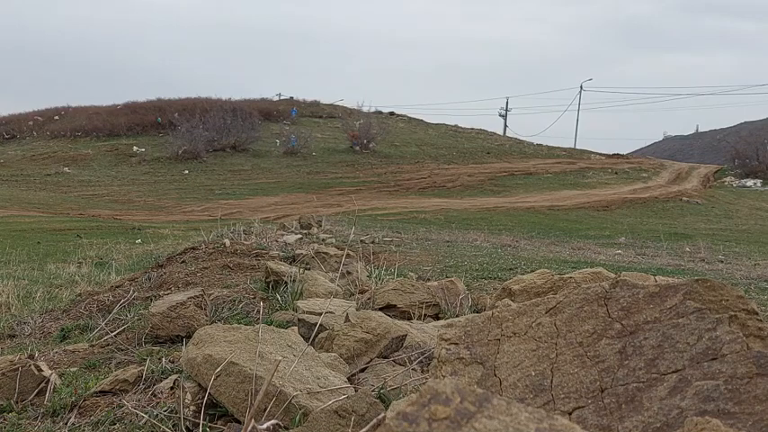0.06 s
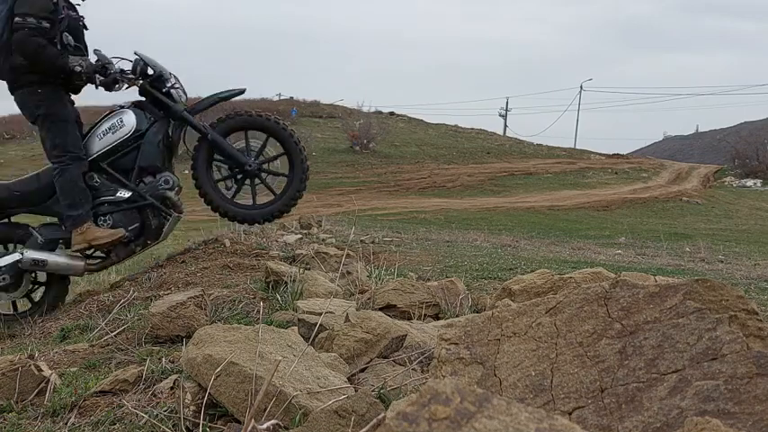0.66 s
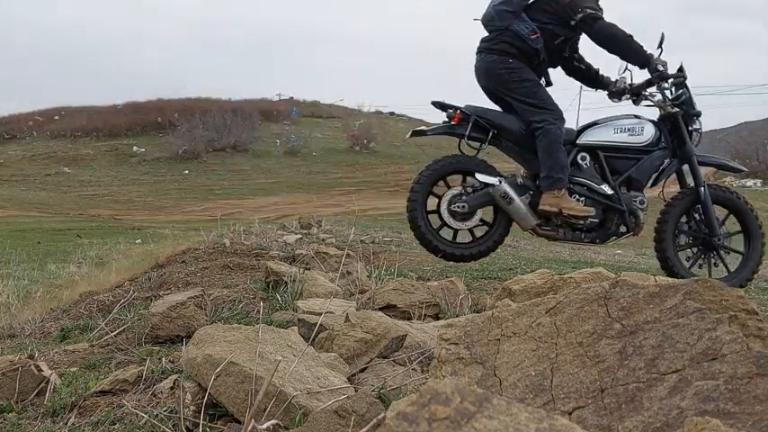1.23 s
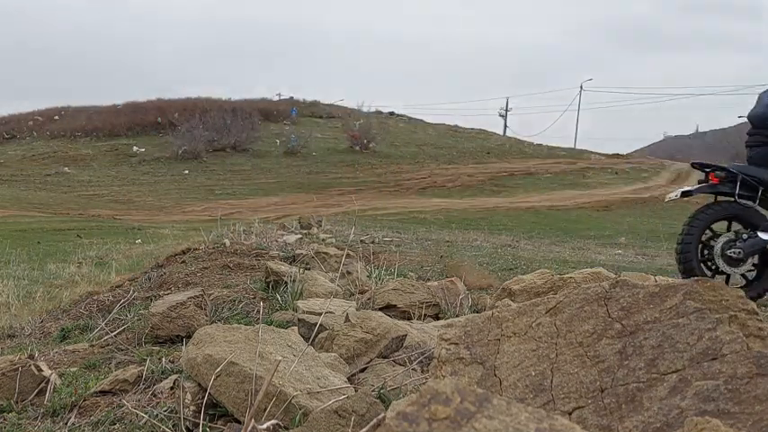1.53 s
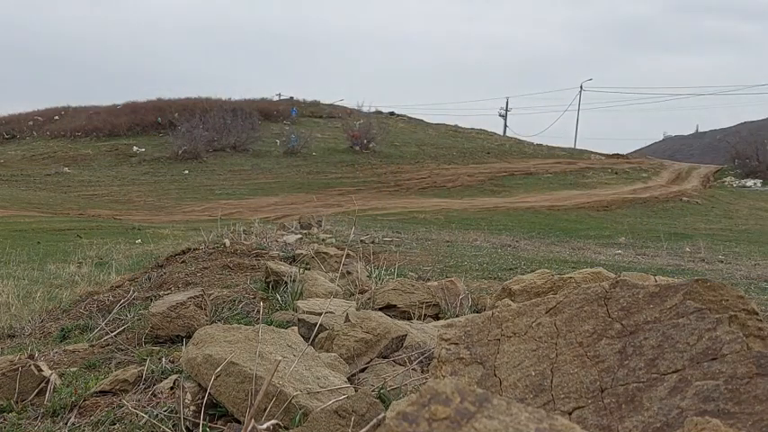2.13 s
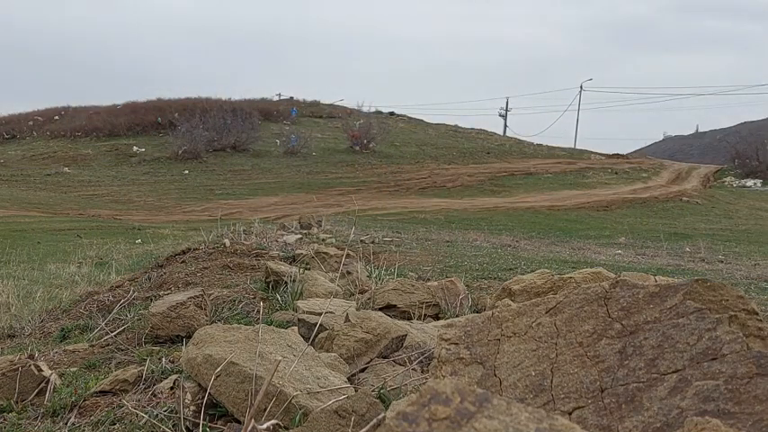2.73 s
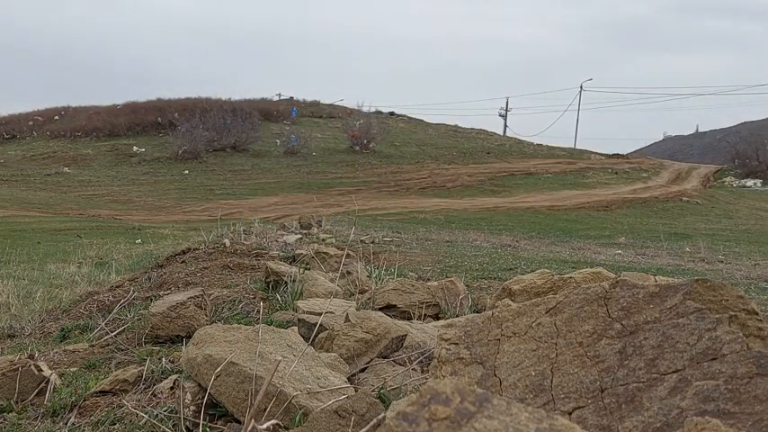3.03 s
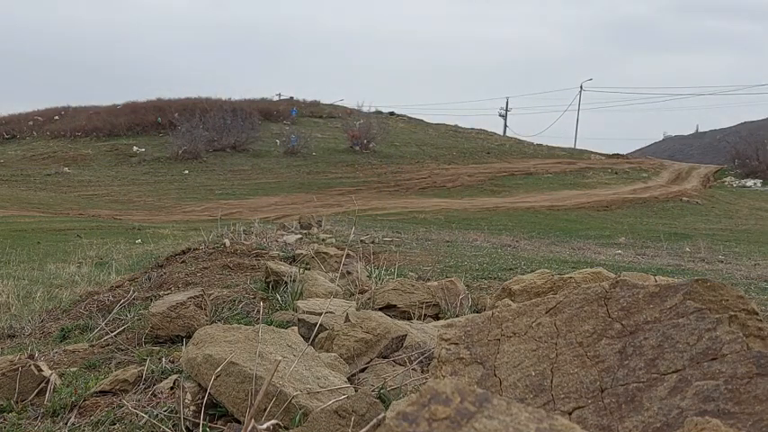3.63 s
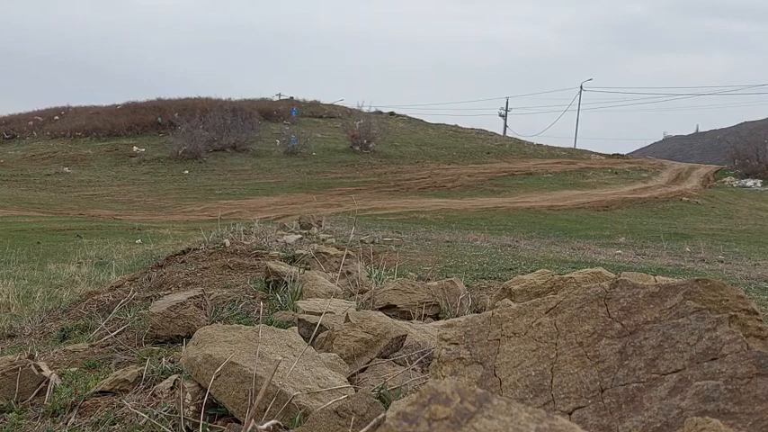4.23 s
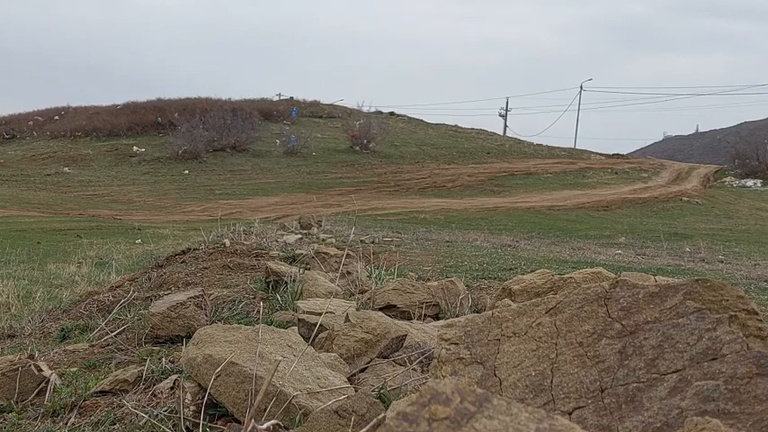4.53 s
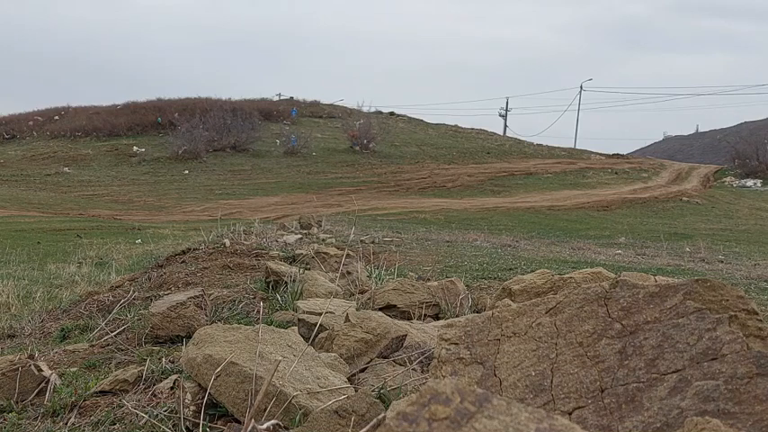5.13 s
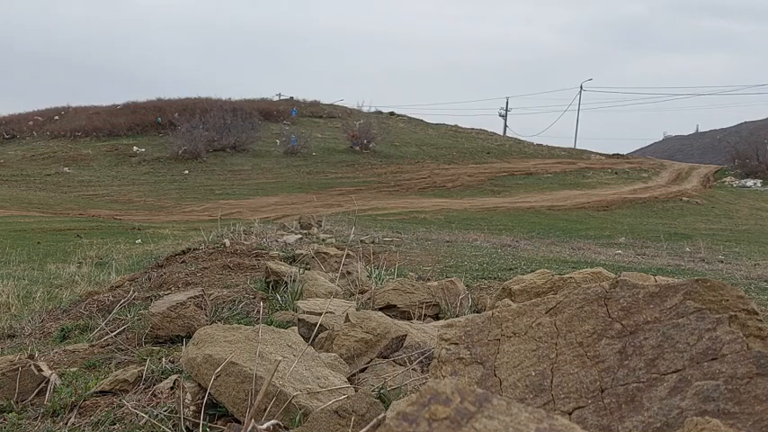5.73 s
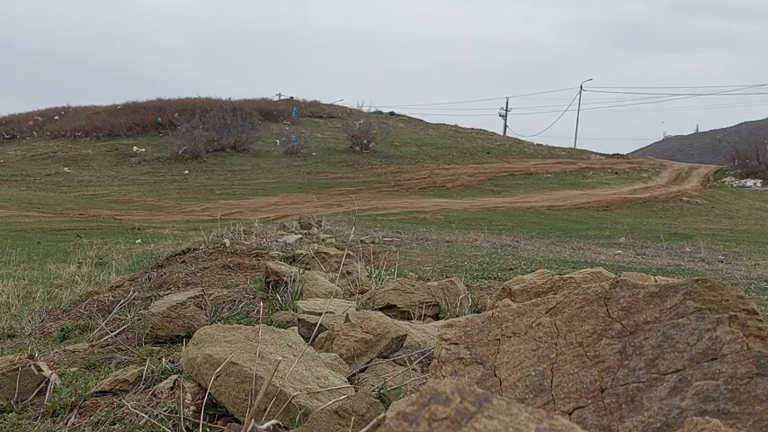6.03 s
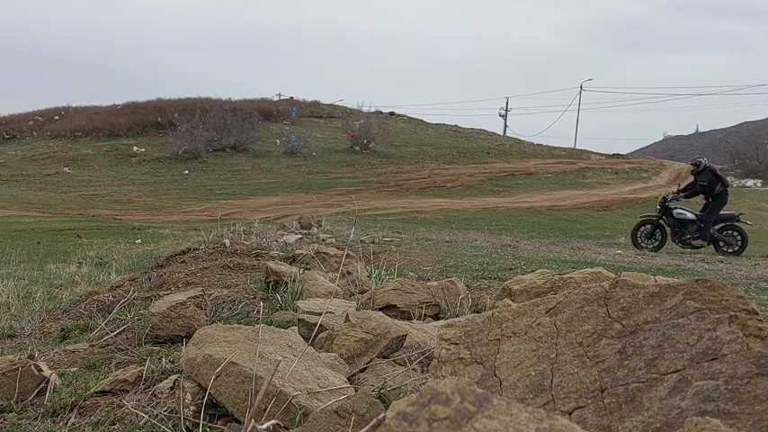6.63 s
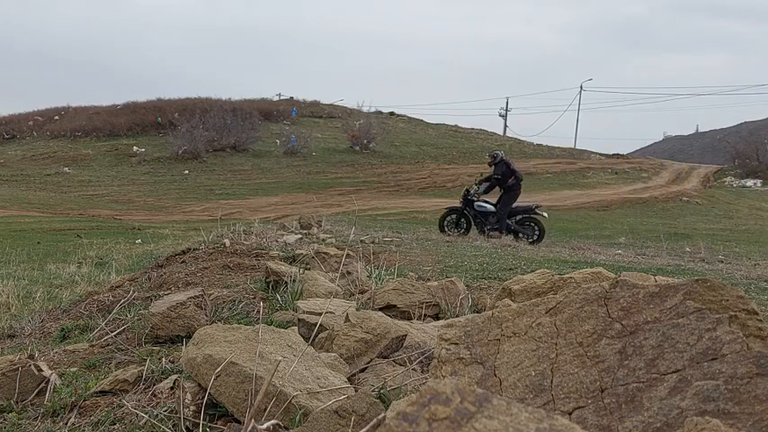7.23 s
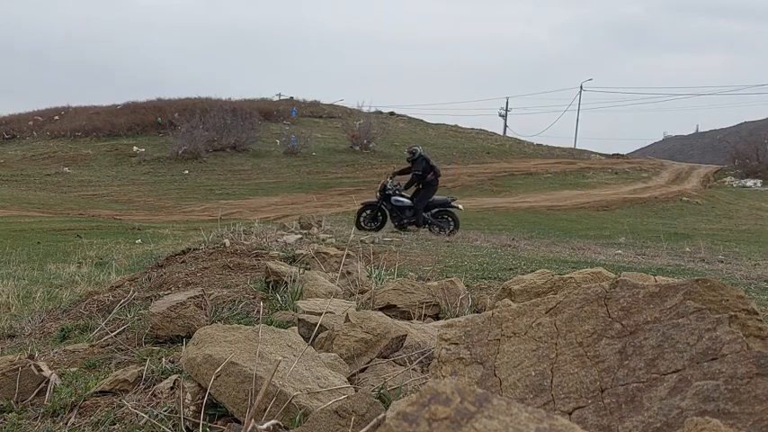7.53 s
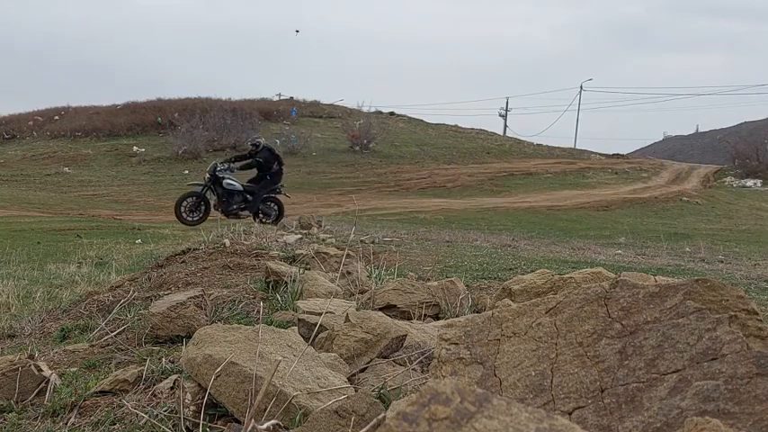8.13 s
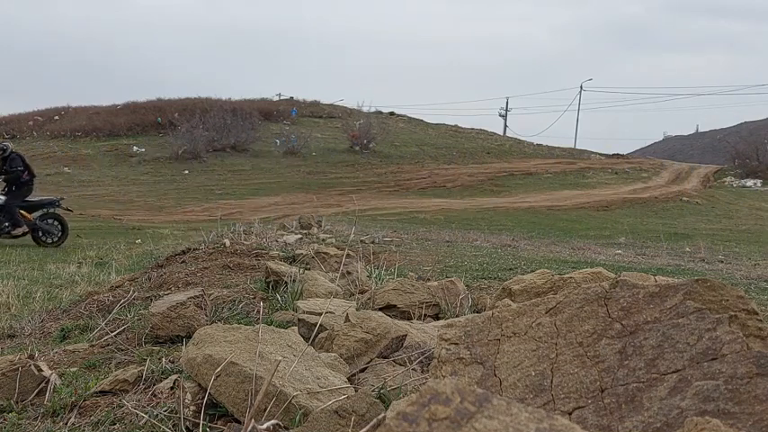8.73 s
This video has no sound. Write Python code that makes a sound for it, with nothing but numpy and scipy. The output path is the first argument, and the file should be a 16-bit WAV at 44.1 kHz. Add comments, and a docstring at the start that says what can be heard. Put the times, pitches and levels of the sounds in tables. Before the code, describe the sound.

A twin-cylinder motorcycle revs hard close to the microphone, passing from left to right, and lands a jump with sharp clanks. It coasts away, burbling and popping, and gives quieter bursts of throttle in the distance. Then it accelerates back and crosses to the left, with engine clatter and the hiss of chain and tyres on dirt, over a low rush of open air.

```python
"""V-twin on a dirt hillside

A 90-degree V-twin motorcycle jumps a mound close by, lands, rides off, turns and comes back.
Two unevenly spaced firings a cycle ring the exhaust: barking on the throttle, burbling and popping
off it. The intake honks, valves clatter, a gear whines, chain and tyres hiss and sharp knocks cut in.
The bike travels across the stereo field, and the slopes scatter a short tail behind it."""
import sys
import numpy as np
from scipy import signal
from scipy.fft import rfft, irfft
from scipy.io import wavfile
from scipy.ndimage import uniform_filter1d, map_coordinates

SR = 44100
rng = np.random.default_rng(int(sys.argv[2]) if len(sys.argv) > 2 else 0)


def transcribe(signal):
    """Save signal, clipped to [-1, 1], as a 16-bit WAV file at the path in sys.argv[1]."""
    frames = np.atleast_2d(signal).T
    limited = np.clip(frames, -1, 1)
    pcm = np.round(limited * 32767).astype(np.int16)
    wavfile.write(sys.argv[1], SR, pcm)


N = 395577
T = np.arange(N) / SR


# tone of the pipe, throttle open and shut, from behind and in front: (frequency [Hz], level [dB])
PIPE_OPEN_REAR = [(28, -50.5), (60, 7), (85, 0), (110, 7), (140, 4), (170, -2.5), (200, -3.5), (240, -8),
                  (285, -13), (345, -13.5), (410, -21.5), (500, -29), (620, -31.5), (850, -53)]
PIPE_OPEN_FRONT = [(28, -23.5), (60, -4), (95, -8.5), (120, 5), (145, 6.5), (175, 0.5), (210, -14.5),
                   (260, -5), (300, -9), (360, -14), (420, -29.5), (500, -39.5), (620, -43.5), (850, -66)]
PIPE_SHUT_REAR = [(25, -50.5), (55, 20.5), (80, 10.5), (125, 24.5), (165, 13.5), (200, 2.5), (230, 7.5),
                  (280, -26.5), (330, -21), (400, -29.5), (500, -17.5), (620, -24), (850, -42)]
PIPE_SHUT_FRONT = [(25, -44), (48, 3), (63, 10.5), (78, 13.5), (100, 4), (145, 10.5), (190, -3), (230, 2),
                   (280, -14), (335, -9.5), (400, -26.5), (530, -28), (620, -44), (850, -45.5)]
# standing waves in pipe and silencer: (frequency [Hz], width [Hz], lift [dB])
STANDING_WAVES = [(86, 18.4, 14.5), (143.2, 19, 8), (175.3, 2.1, 13), (225, 38, 10), (339.7, 13, 7.5),
                  (344, 43, 3.5), (422, 120, 10), (474, 64, 6.5), (544, 8.1, 10), (665, 6.8, -5)]

def exhaust(loaded, shut, rpm, front, bark_db, bark_hz=270, bark_offset_db=14):
    """Firing pulses and their turbulence ring the pipe; a shelf above bark_hz sets the bark."""
    lugging = np.minimum(2100 / rpm, 1.2) ** 3  # low revs burn less evenly
    # turbulence roughens the upper harmonics and leaves the low end clean
    upper = signal.butter(1, 176, "high", fs=SR, output="sos")
    drive = loaded + .36 * lugging * signal.sosfilt(upper, turbulence(loaded))
    coast = shut + 1.05 * signal.sosfilt(upper, turbulence(shut))
    behind = ring(drive, body(PIPE_OPEN_REAR, STANDING_WAVES)) + ring(coast, body(PIPE_SHUT_REAR))
    ahead = ring(drive, body(PIPE_OPEN_FRONT)) + ring(coast, body(PIPE_SHUT_FRONT))
    pipe = -steady(silencer((1 - front) * behind + front * ahead))
    bark = signal.sosfiltfilt(signal.butter(2, bark_hz, "high", fs=SR, output="sos"), pipe)
    return steady(pipe + (undb(bark_db + bark_offset_db) - 1) * bark)


def firings(cycles, angle, load_db, shut_db, lead_s=.0011, jitter_s=.00005):
    """One cylinder's pulses in two rows: tight with the throttle open, looser with it shut."""
    times = moments(cycles, angle)
    slip, force = rng.standard_normal((len(times), 2)).T
    is_open = throttle_open(times)
    times = times - lead_s + jitter_s * slip * np.where(is_open, 1, 2)
    return np.array([clicks(times, is_open * undb(load_db + .9 * force)),
                     clicks(times, ~is_open * undb(shut_db + 2 * force))])


def long_header(pulses, dull_hz=480):
    """The first cylinder's longer pipe rounds its pulses: it thuds where the second barks."""
    return signal.sosfiltfilt(signal.butter(2, dull_hz, fs=SR, output="sos"), pulses)


def turbulence(pulses, rise_s=.006):
    """Gas noise trails each pulse, with as much energy as the pulse."""
    swell = puff(rise_s)
    power = np.abs(ring(pulses ** 2, swell / swell.sum()))
    return np.sqrt(power) * rng.standard_normal(N)


def silencer(x, late_hz=75):
    """The lowest notes leave the silencer a little late."""
    pole = np.exp(-2 * np.pi * late_hz / SR)
    return signal.lfilter([-pole, 1], [1, -pole], x)


# the rider's revs, one list for each burst of drive: (time [s], crank speed [rpm])
REV_BURSTS = [
    [(0.0, 2566), (0.18, 2224), (0.37, 2266), (0.65, 3184), (0.76, 2746), (0.94, 3716)],
    [(1.22, 3013), (1.37, 4257)],
    [(2.98, 1515), (3.13, 1753), (3.37, 1530), (3.49, 2061), (3.72, 2390)],
    [(4.09, 1815), (4.22, 2045), (4.97, 2243), (5.45, 2052)],
    [(5.64, 1633), (5.76, 2103), (6.16, 3107), (6.24, 2705), (6.43, 4158), (6.58, 3538)],
    [(7.65, 2350), (7.76, 2780), (7.94, 2990), (8.04, 3370), (8.23, 3500), (8.33, 4200), (8.41, 4230),
     (8.48, 4050)],
    [(8.59, 2400), (8.69, 2950), (8.77, 3000), (8.97, 2600)],
]

def engine_speed(drop_s=.13):
    """Between bursts the revs drop towards the pace of the rolling wheel, then drift to the next."""
    rolling_rpm = [2788, 2300, 1608, 2629, 2525, 1700]  # one for each gap
    rpm = curve([point for burst in REV_BURSTS for point in burst])
    for before, after, rolling in zip(REV_BURSTS, REV_BURSTS[1:], rolling_rpm):
        (start, high), (end, resume) = before[-1], after[0]
        gap = (T > start) & (T < end)
        since = T[gap] - start
        coasting = rolling + (high - rolling) * np.exp(-since / drop_s)
        rpm[gap] = coasting + (resume - coasting) * since / (end - start)
    return rpm


# pulls on the throttle, some back to back: (opens [s], hardest [s], ends [s])
PULL_CUES = [(-.3, -.03, .425), (.425, .52, .74), (.74, .87, .95), (1.14, 1.2, 1.215), (1.215, 1.33, 1.44),
             (2.99, 3.39, 3.57), (3.57, 3.66, 3.78), (3.78, 3.88, 3.99), (4.07, 4.39, 4.56),
             (4.56, 4.92, 5.13), (5.13, 5.3, 5.47), (5.68, 5.86, 5.93), (5.93, 6.06, 6.23),
             (6.23, 6.41, 6.71), (7.66, 8.0, 8.25), (8.25, 8.4, 8.5), (8.63, 8.7, 8.78)]
# the mix at the crest of each: (exhaust [dB], bark [dB], gas spit [dB], thrown dirt [dB], intake [dB])
PULL_MIX = [(-14, -11.5, -49.5, -65, -40), (-11.5, -7.5, -38.5, -48.5, -43.5),
            (-14.5, -5.5, -41, -55, -38.5), (-13.5, -13, -57, -63, -45), (-13.5, -5, -43, -52, -38.5),
            (-18.5, -8.5, -50, -65, -41), (-19.5, -3.5, -67, -72, -40.5), (-25, -14.5, -78, -91, -50),
            (-19.5, -8, -56.5, -64.5, -45.5), (-20, -9, -69.5, -68, -54.5), (-22.5, -14.5, -87, -71, -54.5),
            (-20.5, -15, -76, -92, -54), (-17, -12.5, -60, -55.5, -45.5), (-18.5, -11, -59, -50.5, -41.5),
            (-18, -10.5, -68, -55, -47), (-20, -58, -59, -54, -51), (-19, -20, -69, -60, -52.5)]

def pull_levels(sags_db=(1.5, 4, 8.5, 6, 5), blend_s=.015):
    """Five faders in dB: each pull arches up to its hardest moment and sags again."""
    cues = np.array(PULL_CUES)
    nearest = np.searchsorted((cues[:-1, 2] + cues[1:, 0]) / 2, T)
    opens, hardest, ends = cues[nearest].T
    off_crest = np.maximum((hardest - T) / (hardest - opens), (T - hardest) / (ends - hardest))
    slack = np.minimum(off_crest, 1) ** 2
    return [uniform_filter1d(db[nearest] - sag * slack, int(blend_s * SR))
            for db, sag in zip(np.transpose(PULL_MIX), sags_db)]


def throttle_open(times):
    """True at the times that fall within a pull."""
    return sum((times >= opens) & (times < ends) for opens, _, ends in PULL_CUES) > 0


# colour of escaping gas: (frequency [Hz], level [dB])
GAS_TONE = [(800, -5.5), (1400, -2), (2200, -8), (3500, -7.5), (6800, -6.5), (9000, -17.5), (12000, -8.5),
            (15500, -13)]

def spit(pulses, rise_s=.0019, scatter_db=3):
    """A jet of gas leaves the pipe at each firing, about as strong from either cylinder."""
    jets = np.sqrt(np.abs(pulses)) * undb(scatter_db * rng.standard_normal(N))
    return steady(ring(jets, puff(rise_s)) * hiss(GAS_TONE))


# stray firings: (time [s], thump [dB], crack [dB])
POP_CUES = [(1.617, -14.5, -52), (2.423, -12, -32.5), (2.772, -16, -42), (7.462, -21.5, -66)]

def pops():
    """Unburnt fuel goes off in the pipe: a thump with a crack on top."""
    times, thump_db, crack_db = np.transpose(POP_CUES)
    pipe = body(PIPE_OPEN_REAR)
    thump = ring(clicks(times, undb(thump_db)), -pipe / np.abs(pipe).max())
    crack = ring(clicks(times, undb(crack_db)), puff(.0023)) * hiss(GAS_TONE)
    return thump + crack


# air rushing into the intake: (frequency [Hz], level [dB])
INTAKE_TONE = [(320, -9), (400, 1), (450, -3.5), (520, -1.5), (630, -6.5), (760, -18)]

def intake(cycles, rpm, front, low_hz=260, high_hz=570, rush_db=-8, scatter_db=2):
    """Once a cycle the intake gulps with a rising honk; from the front a steady rush takes over."""
    opens, length = .3, .65  # in cycles
    gulp, since = np.divmod(cycles - opens + 1, 1)
    progress = np.minimum(since / length, 1)
    since_s = since * 120 / rpm
    honk = np.sin(2 * np.pi * since_s * (low_hz + (high_hz - low_hz) * progress / 2))
    size = undb(scatter_db * rng.standard_normal(int(gulp[-1]) + 1))[gulp.astype(int)]
    gulps = unit(size * np.sin(np.pi * progress) ** 2 * (honk + undb(rush_db) * hiss(INTAKE_TONE)))
    rushing = .8 * front ** 4
    return np.sqrt(1 - rushing) * gulps + np.sqrt(rushing) * hiss(INTAKE_TONE)


# tone of the engine cases: (frequency [Hz], level [dB])
CASE_TONE = [(300, 8), (650, -5), (850, -8.5), (1150, -3), (1450, -8), (1900, -1.5), (2500, -4),
             (3100, -10), (4000, -14), (5500, -15), (9000, -34)]
# ring of the cooling fins: (frequency [Hz], level [dB], time to fall 60 dB [s])
FIN_MODES = [(1040, -16.5, .06), (1604, -12, .06), (1980, 1.5, 0.035), (1970, -3, .06), (2960, 2.5, 0.026),
             (3670, -13, .06), (4000, -7, 0.069), (5470, -8.5, .05)]

def clatter(cycles, fins_db=-20, wash_db=-3):
    """Valve taps rattle the cases and ring the fins, over a steady wash."""
    rattle = ring(valve_taps(cycles, scatter_db=2.5), puff(.0019)) * rng.standard_normal(N)
    t = T[:SR // 4]
    fin_ring = sum(undb(db - 60 * t / t60) * np.sin(2 * np.pi * hz * t) for hz, db, t60 in FIN_MODES)
    cases = unit(ring(rattle, body(CASE_TONE)))
    fins = unit(ring(rattle, fin_ring))
    return steady(cases + undb(fins_db) * fins + undb(wash_db) * hiss(CASE_TONE))


# the eight taps of the valve gear: (angle [cycles], level [dB])
VALVE_RHYTHM = [(.05, -9), (.2, -9), (.33, -2), (.45, -7), (.57, -2), (.68, -9), (.8, 0), (.9, 0)]

def valve_taps(cycles, scatter_db):
    """The valves open and seat in the same lopsided rhythm every cycle."""
    out = 0
    for angle, db in VALVE_RHYTHM:
        times = moments(cycles, angle)
        out += clicks(times, undb(db + scatter_db * rng.standard_normal(len(times))))
    return out


# top end of the valve taps: (frequency [Hz], level [dB])
RASP_TONE = [(1700, -13), (2400, 2.5), (3500, -7), (6000, -4.5), (9000, -15.5), (13000, -9.5), (15500, -18)]

def rasp(cycles, rise_s=.0013):
    """A short burst of bright noise puts an edge on each valve tap."""
    return steady(ring(valve_taps(cycles, scatter_db=5), puff(rise_s)) * hiss(RASP_TONE))


# covers, sprocket and chain guard: (frequency [Hz], width [Hz], loudest [s], spread [s], level [dB])
PANEL_NOTES = [(2500, 560, 2.3, 0.54, -54), (2080, 260, 3.2, 0.53, -48.5), (2400, 350, 4.9, 0.41, -43.5),
               (4060, 180, 6.5, 0.39, -45), (5600, 260, 8.35, 0.33, -49), (3020, 100, 8.3, 0.39, -54),
               (5130, 1200, 8.8, 0.22, -46.5)]

def panels(cycles, rise_s=.003):
    """Panels ring under the rattle; each beams its note at the listener for part of the ride."""
    shaking = ring(valve_taps(cycles, scatter_db=2.5), puff(rise_s))
    out = 0
    for hz, width, loudest, spread, db in PANEL_NOTES:
        band = signal.butter(2, [hz - width / 2, hz + width / 2], "band", fs=SR, output="sos")
        note = steady(signal.sosfilt(band, shaking * rng.standard_normal(N)))
        beam = np.exp(-((T - loudest) / spread) ** 2 / 2)
        out += undb(db) * beam * note
    return out


# fader ride of the gear whine: (time [s], level against the clatter [dB])
WHINE_FADER = [(0, 8), (.38, -7.5), (.48, -5), (1.45, -15), (1.65, -13), (2.6, -4.5), (3.4, -8), (4.2, -43)]

def gear_whine(cycles, meshes_per_cycle=66):
    """The primary gear's teeth mesh in a tone that flutters with the uneven crank."""
    flutter = 1.05 * hiss([(8, 0), (30, -3)])
    tremble = 1 + .4 * hiss([(8, 0), (40, -3)])
    return undb(curve(WHINE_FADER)) * tremble * np.sin(2 * np.pi * meshes_per_cycle * cycles + flutter)


# chain and tyre hiss, and dirt flung by the rear tyre: (frequency [Hz], level [dB])
CHAIN_TONE = [(1500, -3), (3500, -1.5), (5300, -7), (6800, -5.5), (8000, -8), (10000, -10.5),
              (12000, -11.5), (15500, -12)]
DIRT_TONE = [(700, -11), (1500, -25), (2500, -4.5), (3500, -1), (5300, 0.5), (7000, -2), (9000, -7),
             (12000, -4), (15500, -26)]

def chain_and_dirt(chain_gain, dirt_gain):
    """Chain and tyres hiss over the ground; flung dirt adds a grittier spray."""
    return chain_gain * crunch(CHAIN_TONE, grit_db=-6) + dirt_gain * crunch(DIRT_TONE, grit_db=-2)


def crunch(tone, grit_db, spread_db=9.5, grains_per_s=500):
    """A hiss of the given tone, with grains of dirt crunching in it."""
    hits = rng.random(N) < grains_per_s / SR
    grains = hits * undb(spread_db * np.minimum(rng.exponential(size=N), 4))
    grit = ring(grains, puff(.00012)) * rng.standard_normal(N)
    return unit(hiss(tone) + undb(grit_db) * unit(ring(grit, body(tone))))


# the landing clanks, stone hits and two sharp exhaust cracks: (time [s], level [dB], decay [s])
KNOCK_CUES = [(.432, -30, 0.035), (0.806, -25, 0.0018), (1.255, -24.5, 0.0022), (1.321, -26, 0.0022),
              (1.413, -13, 0.0039), (1.419, -28, 0.0018), (1.433, -15, 0.0014), (1.441, -30, 0.0042),
              (7.652, -45, 0.003), (7.803, -42, 0.0029), (7.857, -37, 0.0019), (8.655, -35, 0.0045)]
# the hard, bright tone they share: (frequency [Hz], level [dB])
KNOCK_TONE = [(150, 7), (600, 10), (1300, 2.5), (2200, 5.5), (3000, 16), (3800, 5), (5000, 9.5), (7000, 1),
              (10000, -6), (15500, -3.5)]

def knocks():
    """Each clank, hit or crack is a burst of noise with an instant attack and a fast decay."""
    envelope = sum(undb(db) * (T >= s) * np.exp(-np.abs(T - s) / decay) for s, db, decay in KNOCK_CUES)
    return envelope * hiss(KNOCK_TONE)


# the bike's bearing: (time [s], lag of left behind right [ms])
PAN_PATH = [(.1, -0.36), (.6, -.21), (1, -0.043), (1.4, 0.12), (1.8, 0.23), (2.1, 0.29), (2.65, 0.36),
            (5, 0.337), (6.6, 0.14), (7.15, 0.056), (8.97, -0.17)]

def pan(x, left_db, shade_db_per_ms=3):
    """The side further from the bike hears it later and weaker; left_db tilts the balance."""
    lag_ms = curve(PAN_PATH)
    lag = lag_ms * SR / 1000
    balance_db = left_db - shade_db_per_ms * lag_ms
    return np.array([undb(side * balance_db / 2) * map_coordinates(x, [np.arange(N) - side * lag / 2])
                     for side in (1, -1)])


def hillside(x, decay_s=.03, predelay_s=.002, size=8192):
    """Rocks and slopes scatter a short stereo tail, ever changing as the bike moves."""
    fade = np.sqrt(signal.get_window("hann", size))
    padded, out = np.pad(x, size), np.zeros((2, N + 4 * size))
    for start in range(0, N + size, size // 2):
        tails = rng.standard_normal((2, size)) * np.exp(-T[:size] / decay_s) * (T[:size] > predelay_s)
        tails /= np.sqrt(np.sum(tails ** 2, axis=1, keepdims=True))
        piece = fade * padded[start:start + size]
        out[:, start:start + 2 * size - 1] += signal.fftconvolve([piece], tails, axes=1)
    return out[:, size:size + N]


# the outdoor bed: (frequency [Hz], level [dB])
AIR_TONE = [(20, -9), (50, -1), (100, -1), (300, 0.5), (800, -33), (3000, -48.5), (8000, -51.5),
            (15500, -67)]

def open_air():
    """A low rush of air, centred, with a fainter wide layer."""
    return undb(-40) * hiss(AIR_TONE) + undb(-48) * np.array([hiss(AIR_TONE), hiss(AIR_TONE)])


def body(tone, modes=(), size=8192):
    """Impulse response of a (frequency [Hz], level [dB]) curve, lifted at its modes."""
    hz, db = np.transpose(tone)
    f = np.maximum(np.arange(size // 2 + 1) * SR / size, 1)
    outside = np.abs(np.log(f / np.clip(f, hz[0], hz[-1])))  # rolls off past both ends
    gain = undb(np.maximum(np.interp(np.log(f), np.log(hz), db) - 30 * outside, -110))
    for centre, width, lift_db in modes:
        gain *= np.sqrt(1 + (undb(lift_db) ** 2 - 1) / (1 + (2 * (f - centre) / width) ** 2))
    # minimum phase: nothing rings before the hit
    cepstrum = irfft(np.log(gain))
    cepstrum[1:size // 2] *= 2
    cepstrum[size // 2 + 1:] = 0
    return irfft(np.exp(rfft(cepstrum)))


def ring(x, response):
    """Plays x through an impulse response."""
    return signal.fftconvolve(x, response)[:N]


def hiss(tone):
    """Noise of the given tone at unit RMS."""
    return unit(ring(rng.standard_normal(N), body(tone)))


def clicks(times, sizes):
    """One impulse of the given size at each time."""
    out, inside = np.zeros(N), (times >= 0) & (times < T[-1])
    np.add.at(out, (times[inside] * SR).astype(int), sizes[inside])
    return out


def puff(rise_s, size=4096):
    """Envelope that swells to 1 in rise_s and dies away."""
    u = T[:size] / rise_s
    return (u * np.exp(1 - u)) ** 2


def moments(cycles, angle):
    """Times at which the four-stroke cycle passes an angle [cycles]; -1 outside the scene."""
    return np.interp(np.arange(200) + angle, cycles, T, left=-1, right=-1)


def steady(x, size=10001):
    """Evens out the slow level and keeps the punch of single beats."""
    window = np.hanning(size)
    power = signal.fftconvolve(x ** 2, window, "same") / signal.fftconvolve(np.ones(N), window, "same")
    return x / np.sqrt(np.abs(power) + 1e-12)


def unit(x):
    """Scales to unit RMS."""
    return x / np.sqrt(np.mean(x ** 2) + 1e-18)


def curve(points):
    """Automation line through (time [s], value) points."""
    return np.interp(T, *np.transpose(points))


def undb(db):
    """Decibels to gain."""
    return 10 ** (np.asarray(db) / 20)


# loss with distance and the cover of the mound: (time [s], level [dB])
PATH_FADER = [(0, 0.5), (1.43, -0.5), (1.49, -7), (2.1, -7.5), (2.7, -12.5), (3.5, -13), (3.8, -24.5),
              (5.65, -20.5), (6.4, -9.5), (6.8, -16), (7.45, -14.5), (8.1, -7), (8.97, -6)]
# how far the bike shows its front: (time [s], share [0-1])
FRONT_SHARE = [(0, 0.73), (.8, 0.98), (1.4, 0.97), (2, 0.55), (5.3, 0.54), (6.15, 0.97), (8.4, 0.95),
               (8.97, 0.98)]

def scene(cruise_rpm=2500, throttle_travel_s=.07):
    """Revs, throttle and the bike's path ride the faders of the mix."""
    rpm = engine_speed()
    cycles = np.cumsum(rpm) / 120 / SR  # two crank turns a cycle
    # the cylinders fire about 270 and 450 crank degrees apart; the second beat is the stronger
    first = firings(cycles, angle=.362, load_db=-3, shut_db=-7.5)
    second = firings(cycles, angle=.747, load_db=0, shut_db=-2.5)
    loaded, shut = long_header(first) + second
    throttle = uniform_filter1d(throttle_open(T).astype(float), int(throttle_travel_s * SR))
    rev_octaves = np.log2(rpm / cruise_rpm)
    path_db, front = curve(PATH_FADER), curve(FRONT_SHARE)
    turned = curve([(5.3, 0), (6.0, 1)])  # the chain side swings into view, the pipe away

    pull_db, pull_bark_db, spit_db, dirt_db, intake_db = pull_levels()
    burble_db = -23.5 + .3 * path_db + 2.5 * rev_octaves
    burble_bark_db = -1 + .34 * path_db - 22.5 * turned
    pipe_db = throttle * pull_db + (1 - throttle) * burble_db
    bark_db = throttle * pull_bark_db + (1 - throttle) * burble_bark_db
    clatter_db = -44.5 + path_db + 6.5 * rev_octaves + 4 * throttle + 1.5 * front - 5.5 * turned
    chain_db = -52 + .83 * path_db + 5 * rev_octaves + .5 * front + 3.5 * turned
    rasp_db = -47 + path_db - 6.5 * throttle - 4 * front - 5.5 * turned

    machinery = undb(clatter_db) * clatter(cycles) + undb(path_db) * panels(cycles)
    tyres = chain_and_dirt(undb(chain_db), throttle * undb(dirt_db))
    valves = undb(rasp_db) * rasp(cycles)
    voice = undb(pipe_db) * exhaust(loaded, shut, rpm, front, bark_db)
    voice += throttle * undb(intake_db) * intake(cycles, rpm, front) + pops()
    edge = throttle * undb(spit_db) * spit((first + second).sum(axis=0)) + valves + knocks()
    gear = undb(clatter_db) * gear_whine(cycles)
    direct = pan(voice, left_db=-.5) + pan(machinery + gear, left_db=1) + pan(tyres + edge, left_db=3.5)
    # from the front the cases sound thinner: their mids cancel, mostly on the right
    mids = signal.sosfilt(signal.butter(1, [900, 2000], "band", fs=SR, output="sos"), machinery)
    facing = pan(mids * (.25 - .4 * front), left_db=-22)
    # close by, the bike is a wide source and more of its sound is scattered
    close_send = undb(.25 * path_db) * (undb(-2) * machinery + undb(2) * tyres)
    scattered = hillside(undb(-18) * voice + close_send + undb(-14) * edge)
    return direct + facing + scattered + open_air()


def record(dry, ceiling=1.4, top_hz=15850):
    """Soft saturation rounds the loudest peaks; a steep low-pass trims the top."""
    rounded = ceiling * np.tanh(dry / ceiling)
    return signal.sosfilt(signal.ellip(10, .2, 80, top_hz, fs=SR, output="sos"), rounded)


dry = scene()
out = record(dry)
transcribe(out)
```